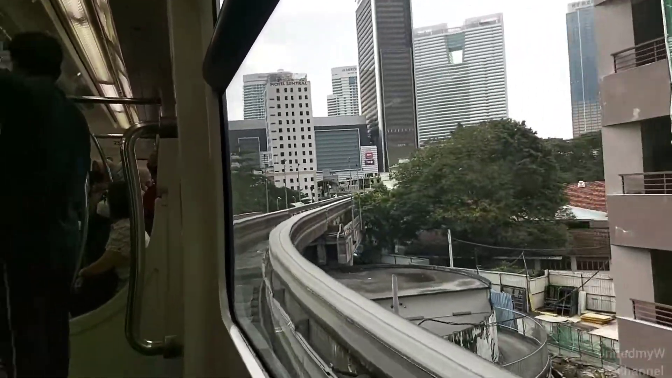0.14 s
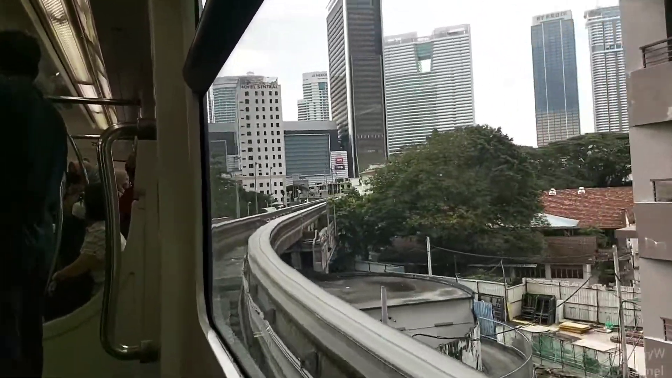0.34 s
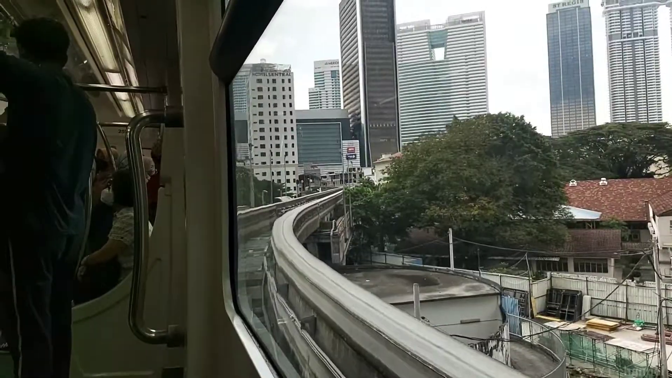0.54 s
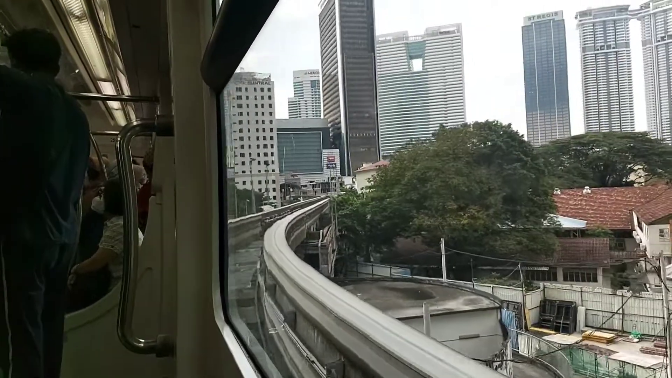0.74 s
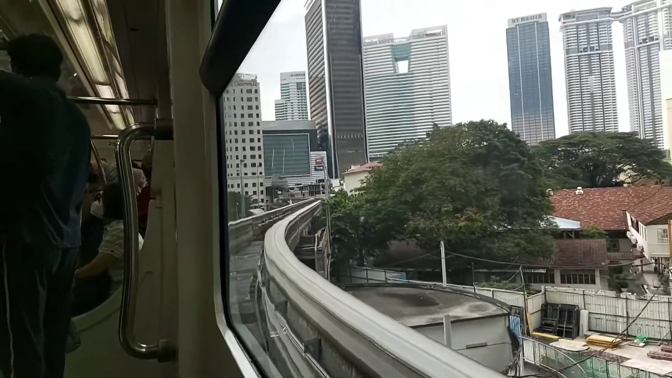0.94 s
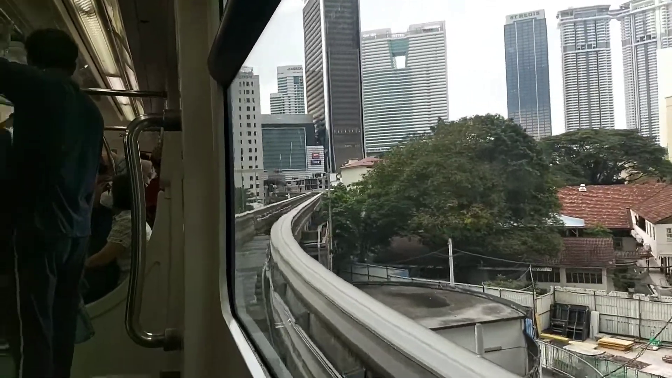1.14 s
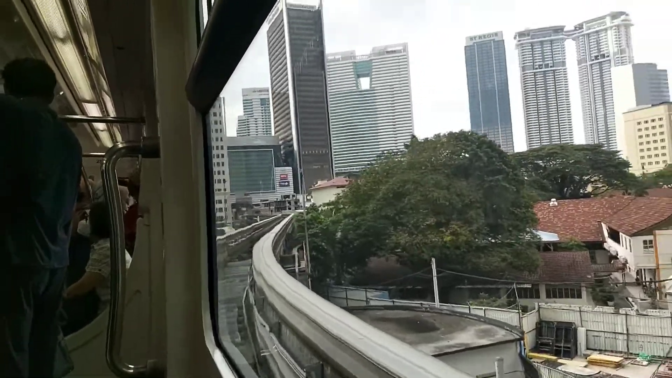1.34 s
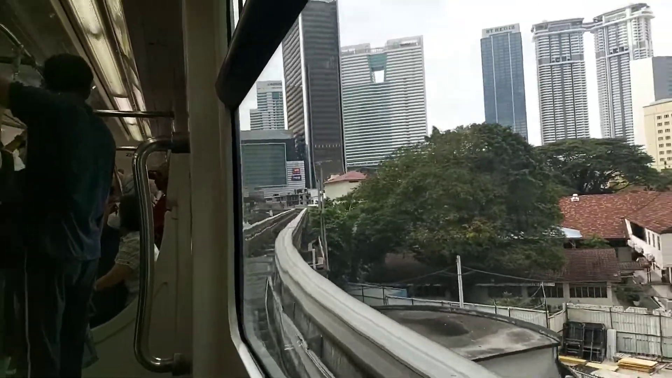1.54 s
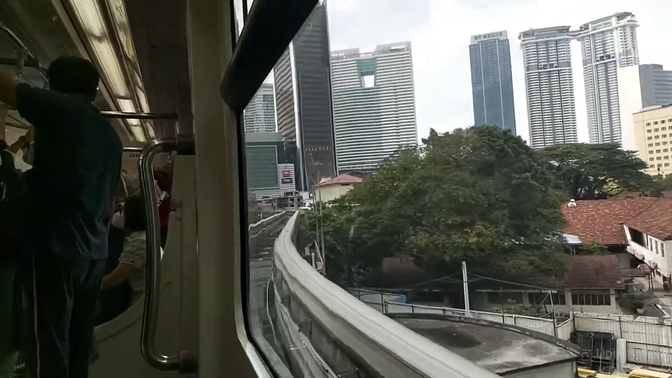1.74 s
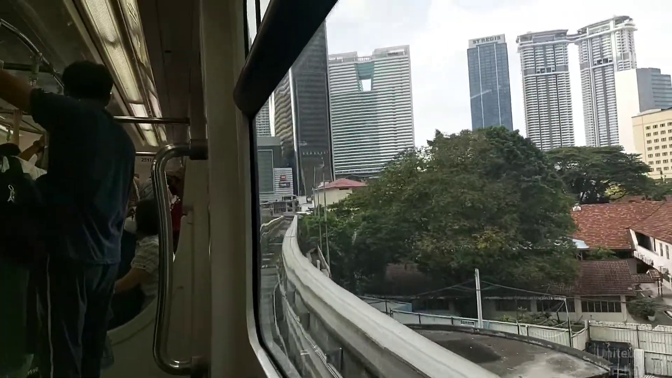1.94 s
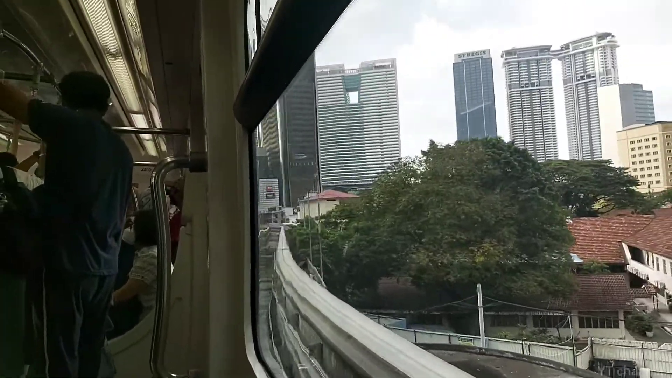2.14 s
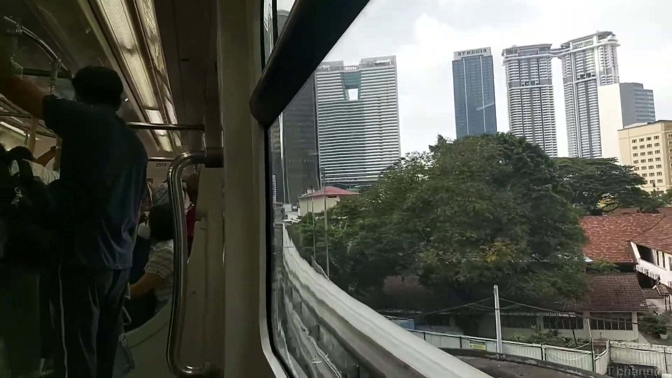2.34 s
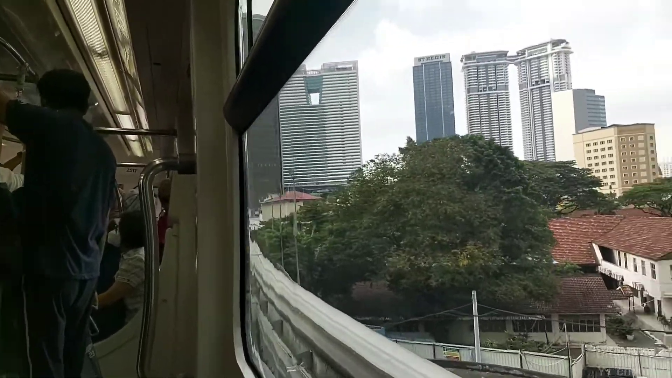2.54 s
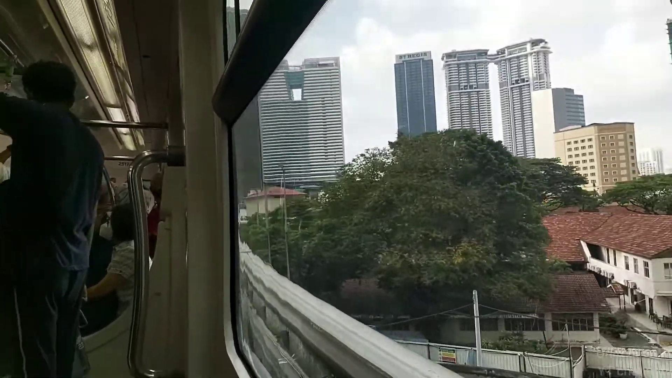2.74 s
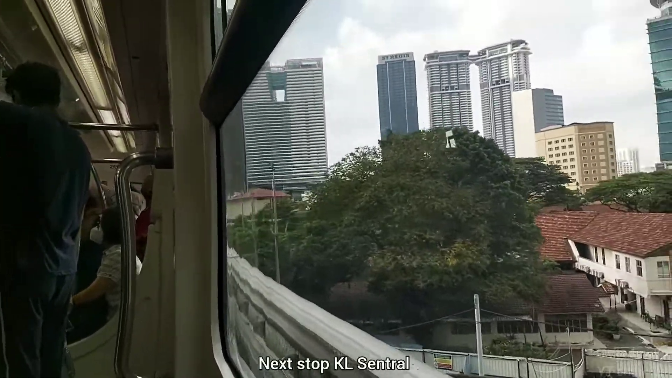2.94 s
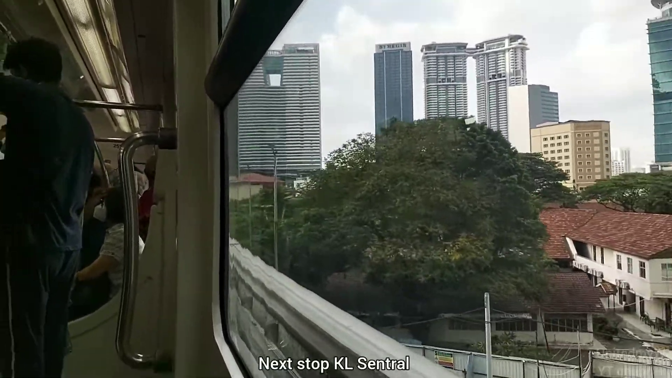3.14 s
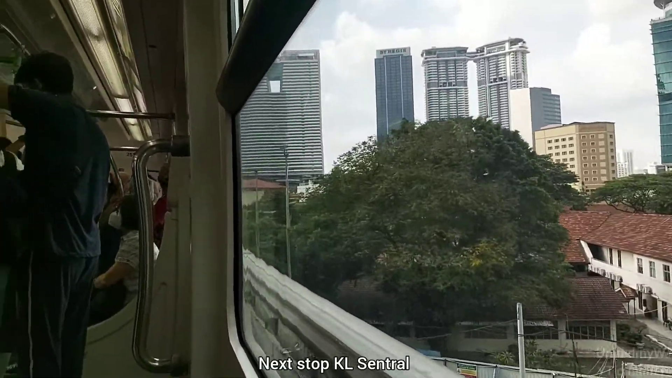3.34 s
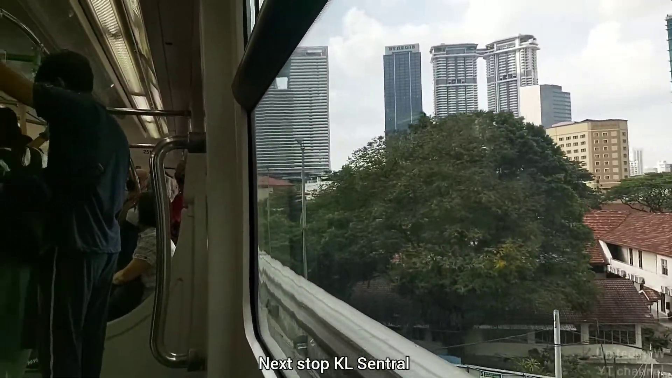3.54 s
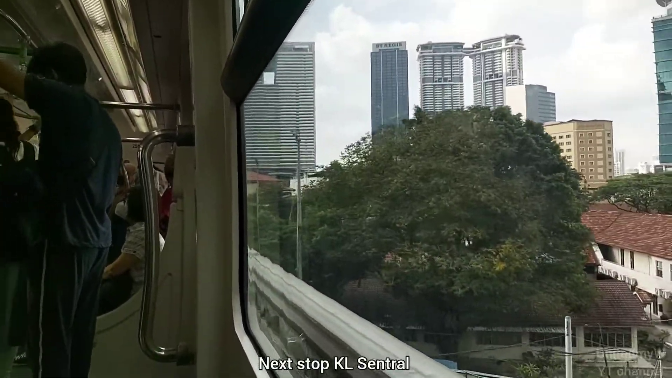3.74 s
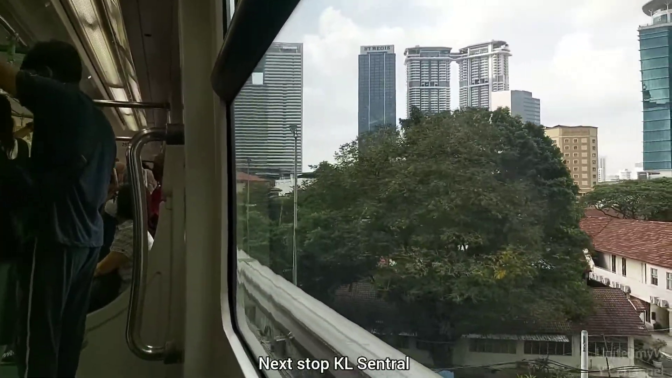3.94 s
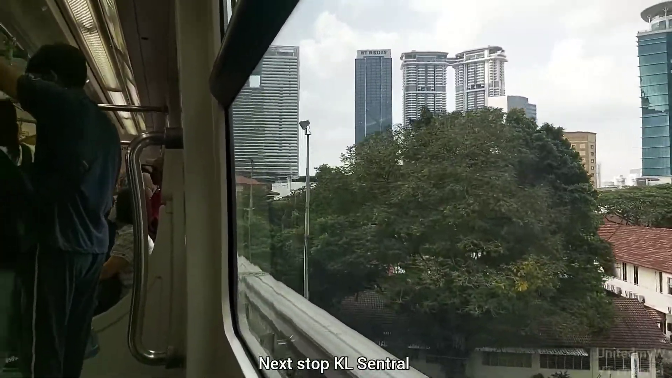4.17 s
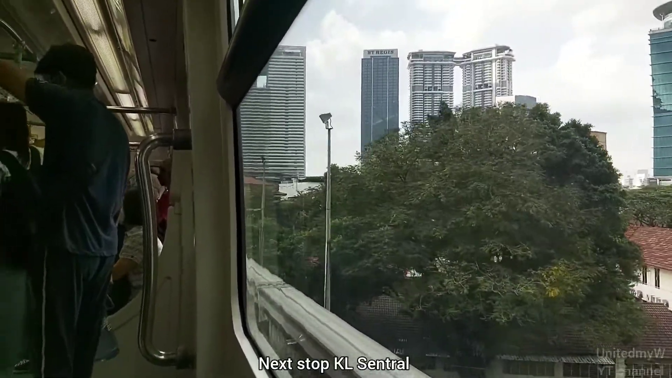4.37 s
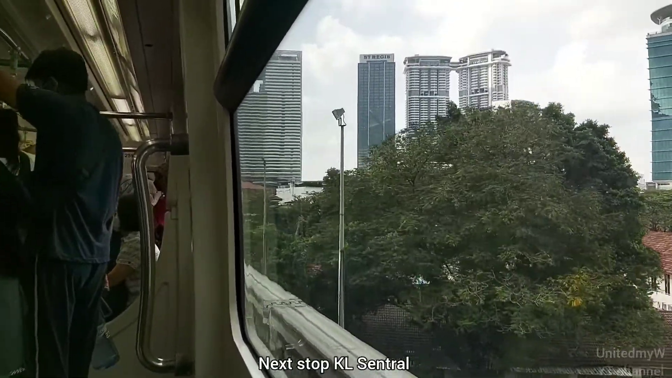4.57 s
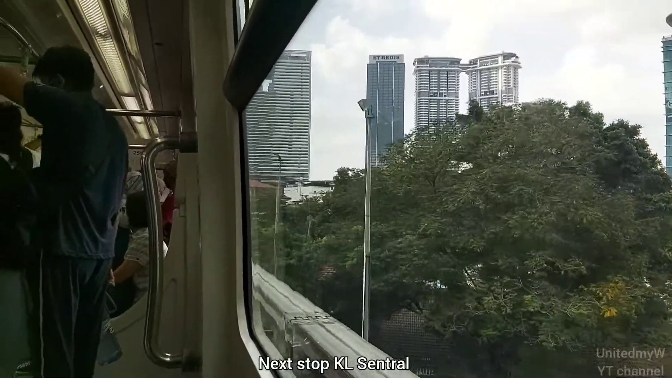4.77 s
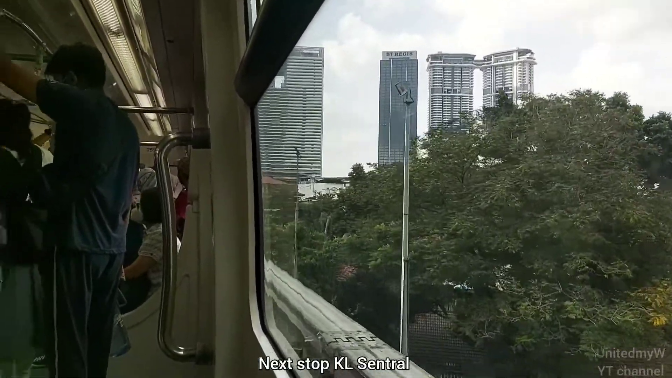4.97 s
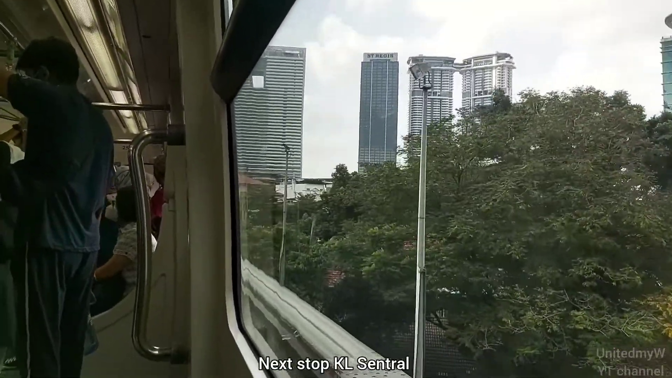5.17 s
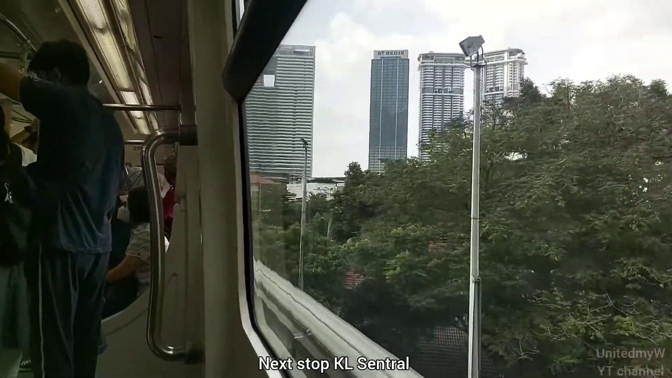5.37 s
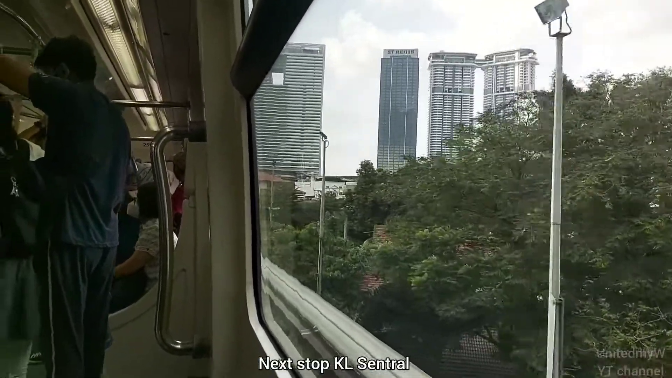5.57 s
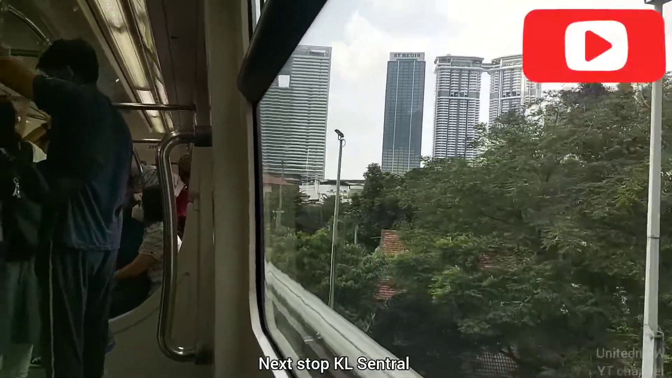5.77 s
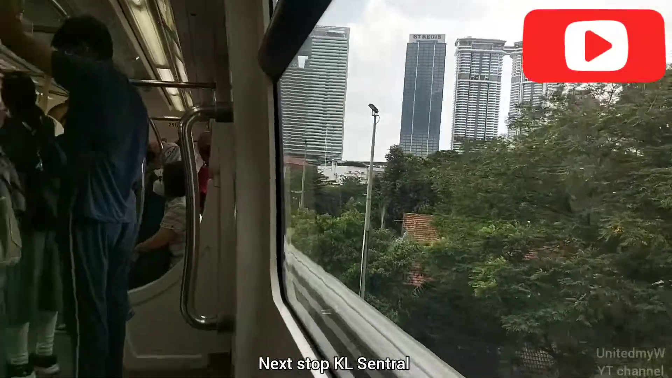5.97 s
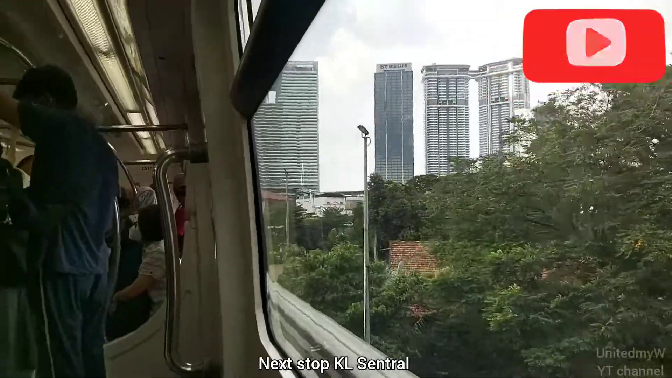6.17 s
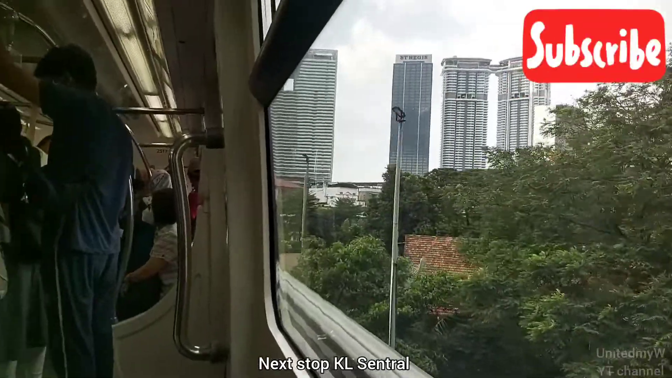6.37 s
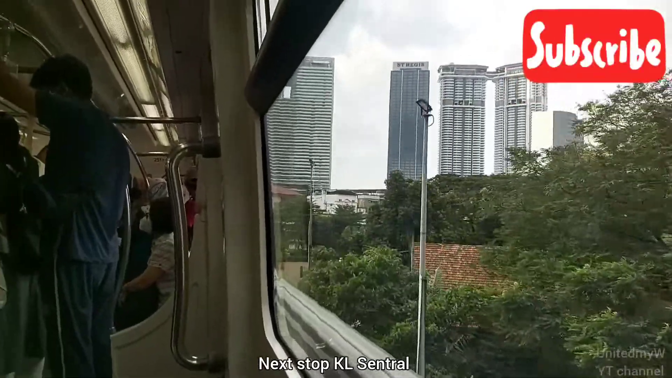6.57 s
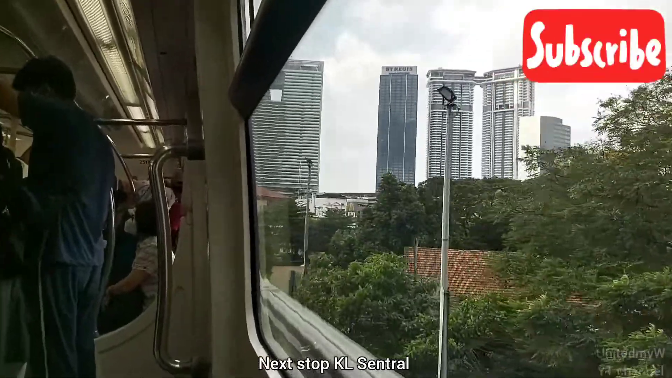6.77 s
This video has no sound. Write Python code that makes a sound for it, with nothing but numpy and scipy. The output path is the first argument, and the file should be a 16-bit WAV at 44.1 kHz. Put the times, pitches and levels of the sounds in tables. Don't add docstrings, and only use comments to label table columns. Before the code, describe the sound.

Steady tyre rumble and muffled rushing air inside a slowing train cabin. A nasal electric gear whine wavers, swells in the middle, then weakens and throbs as it descends. Occasional light ticks, tiny squeaks and chattering panels give way to a double thump with rattle before six seconds, followed by a hard, dry clack. Close, enclosed handheld stereo perspective, with no silence.

```python
import sys
import numpy as np
from scipy import signal
from scipy.fft import rfft, irfft, next_fast_len
from scipy.io import wavfile
from scipy.ndimage import uniform_filter1d

SR = 44100
rng = np.random.default_rng(int(sys.argv[2]) if len(sys.argv) > 2 else 0)


def int16_out(signal):
    q = np.round(np.clip(np.atleast_2d(signal).T, -1, 1) * 32767)
    wavfile.write(sys.argv[1], SR, q.astype(np.int16))


def magnitude_from_level(level_db):
    exponent = np.asarray(level_db, float) / 20
    return 10 ** exponent


N = 300321

# (time [s], level [dB])
RIDE = [(0.0, -18), (0.34, -20), (0.43, -20), (0.95, -18), (1.27, -23.5), (1.4, -19.5), (2.05, -18.5),
        (2.6, -18.5), (2.9, -19), (3.6, -22.5), (4.85, -21), (5.03, -16), (5.2, -22), (5.63, -20.5),
        (5.73, -18), (5.84, -14), (5.99, -18.5), (6.81, -18.5)]
# (time [s], frequency [Hz])
SPEED = [(0.0, 651.5), (.2, 647.5), (.43, 649.5), (.58, 644), (.93, 642), (1.05, 645.5), (1.2, 640.5),
         (1.7, 637.5), (1.78, 638.5), (2.0, 633.5), (2.3, 638.5), (2.5, 634), (3.0, 633.8), (3.4, 623.5),
         (3.8, 613), (5.3, 583.5), (5.7, 574), (6.81, 555.5)]
# (time [s], level [dB])
MOTOR = [(0.0, -35.5), (0.4, -35.5), (0.8, -31), (1.0, -36.5), (1.26, -29), (1.6, -30.5), (1.95, -30),
         (2.3, -32.5), (2.75, -26.5), (3.05, -23.5), (3.5, -23.5), (3.9, -22), (4.25, -23), (4.62, -22.5),
         (5.15, -26.5), (5.6, -30.5), (6.2, -30.5), (6.81, -23.5)]
# (level [dB], relative top level [dB], relative low level [dB])
IDLE_TRIM = (-59, -2.5, 11.2)
# (frequency [Hz], left minus right [dB])
LEAN = [(60, -4), (110, -1.5), (200, -2.5), (380, -5.5), (700, -5), (1290, -3.5), (3300, -2.5), (4300, 1.5),
        (6200, 0), (7200, 6), (7900, 0.5), (8900, -7), (10800, -4), (15000, -0.5)]


def evened(x):
    return x / np.sqrt(np.mean(x ** 2) + 1e-20)


def read(points, hz):
    f, value = np.transpose(points)
    return np.interp(np.log(hz + 1), np.log(f + 1), value)


def columns(rows):
    s, *values = np.transpose(rows)
    return [np.interp(np.arange(N) / SR, s, v) for v in values]


def swells(rows):
    t = np.arange(0, N + 64, 64) / SR
    total = 0
    for s, half, *heights in rows:
        bump = np.maximum(1 - ((t - s) / (2 * half)) ** 2, 0) ** 2
        total = total + np.outer(heights, bump)
    return [np.interp(np.arange(N) / SR, t, v) for v in total]


def wander(hz):
    size = next_fast_len(N)
    rolloff = 1 + (np.fft.rfftfreq(size, 1 / SR) / hz) ** 2
    return evened(irfft(rfft(rng.standard_normal(size)) / rolloff, size)[:N])


def resonate(x, hz, width):
    turn = np.exp(2j * np.pi * np.cumsum(hz) / SR)
    r = np.exp(-np.pi * width / SR)
    low = signal.lfilter([(1 - r) ** 2], [1, -2 * r, r * r], x * turn.conj())
    return evened((turn * low).real)


def ring(hz, width, channels=1):
    b, a = signal.iirpeak(hz, hz / width, SR)
    once = signal.lfilter(b, a, rng.standard_normal((channels, N)))
    return evened(signal.lfilter(b, a, once))


def diffuse(spectrum, patchy_db, size=1024):
    # (frequency [Hz], correlation [1])
    coherence = [(60, .98), (130, .99), (290, .96), (640, .85), (1000, .3), (1400, -.3), (2200, -.03),
                 (15000, 0)]
    frames, hz = 4 * N // size + 5, np.fft.rfftfreq(size, 1 / SR)
    a, b, c, d, patches = rng.standard_normal((frames, len(hz), 5)).T
    patches = evened(uniform_filter1d(uniform_filter1d(patches, 10, 0), 12, 1))
    same = np.clip(read(coherence, hz), -1, 1)[:, None]
    left = a + 1j * b
    right = same * left + np.sqrt(1 - same ** 2) * (c + 1j * d)
    z = np.array([left, right])
    z *= magnitude_from_level(np.outer([.5, -.5], read(LEAN, hz)))[:, :, None]
    z *= magnitude_from_level(read(spectrum, hz)[:, None] + patchy_db * patches)
    x = signal.istft(z, nperseg=size, noverlap=3 * size // 4)[1][:, :N]
    return x / np.sqrt(np.mean(x.mean(0) ** 2))


def steadied(x):
    span = int(.05 * SR)
    power = uniform_filter1d(uniform_filter1d(x.mean(0) ** 2, span), span) + 1e-9
    x = x / power ** (.5 / 2)
    return x / np.sqrt(np.mean(x.mean(0) ** 2))


def placed(x, hz, lag_turns):
    lean = magnitude_from_level(np.array([.5, -.5]) * read(LEAN, hz))
    late = np.interp(np.arange(len(x)) - lag_turns * SR / hz, np.arange(len(x)), x)
    return np.array([lean[0] * x, lean[1] * late])


def tyres():
    # (frequency [Hz], density [dB per Hz])
    rumble = [(12, -48), (20, -19), (86, 1), (135, 0), (230, -13), (300, -8), (510, -120)]
    boom = [(150, -38), (200, 6.5), (330, 5.5), (400, 0), (520, -9), (650, -50)]
    # (frequency [Hz], width [Hz], level [dB])
    cabin = [(93.3, 23, -34), (181.5, 18.3, -33), (281.5, 12.4, -44), (333.2, 13.6, -34.5),
             (385.3, 7.4, -39.5), (577.6, 17, -41)]
    # (time [s], half length [s], rumble [dB], boom
    # [dB])
    joints = [(.2, 0.022, 1, 3), (.33, 0.031, 0.5, 2.5), (.42, 0.029, -4.5, 2.5), (.52, 0.055, 0, -5),
              (.8, 0.026, -1, -2.5), (1.0, 0.027, 4, 2.5), (1.26, 0.034, 1.5, -1.5), (1.348, 0.02, 1.5, 8),
              (1.55, 0.097, 0, 2), (1.722, 0.039, -3, 1), (1.977, 0.032, -3.5, 2.5), (2.2, 0.23, 0, -0.5),
              (2.5, 0.056, -0.5, 5), (2.44, 0.013, -2, -1), (2.655, .02, -4, 0), (5.865, .012, -5, -1),
              (2.69, 0.039, 2, -3), (2.82, 0.042, -1, 0.5), (3.05, 0.062, 1, -4), (3.55, 0.055, 1, 0.5),
              (3.68, 0.023, 3, 0), (4.05, 0.077, 2.5, -3), (4.36, .05, 0, 2), (4.62, 0.064, 1.5, -4),
              (4.8, .05, -1, 2.5), (5.12, 0.026, 1.5, -8), (5.4, 0.052, -0.5, -1.5), (5.6, 0.074, -1.5, 0),
              (5.7, 0.032, 2, -3), (5.77, .04, -1.5, 2), (5.82, 0.037, -1, 4), (5.93, 0.032, -1, 2),
              (6.12, .04, -1, -2.5), (6.3, 0.057, -2, 4), (6.55, 0.086, -0.5, -2), (6.693, 0.026, -6, -2)]
    rumble_db, = columns(RIDE)
    bump_db = rumble_db - rumble_db.mean()
    joint_rumble_db, joint_boom_db = swells(joints)
    out = magnitude_from_level(rumble_db + joint_rumble_db) * steadied(diffuse(rumble, 0.77, size=2048))
    boom_db = -26.5 + 0.52 * bump_db + joint_boom_db
    out += magnitude_from_level(boom_db) * steadied(diffuse(boom, 0.95, size=2048))
    shake = magnitude_from_level(0.24 * bump_db)
    for hz, width, db in cabin:
        out += placed(magnitude_from_level(db) * shake * ring(hz, width)[0], hz, 0.065)
    return out


def throb_of_wheel(hz):
    return np.cos(2 * np.pi * (np.cumsum(hz) / SR / 87 + .63))


def motor():
    # (time [s], level [dB])
    slack = [(.07, -14), (.245, -6), (.36, -5), (.665, -15), (.75, -3), (1.095, -4), (1.405, -18),
             (1.72, -24), (1.855, -7), (2.0, -16), (2.075, -20), (2.11, -18), (.03, -6), (2.64, -2),
             (4.82, -1), (4.9, 1.5), (2.18, -12), (2.225, -8), (2.33, -16), (2.43, -19), (2.575, -22),
             (2.715, -36), (2.78, -12), (2.87, -18), (2.98, -3.5), (3.21, -6), (3.34, -14), (3.445, -5),
             (3.57, -4.5), (3.735, -8), (4.46, -6), (5.09, -13), (5.25, -21), (5.425, -9), (5.555, -22),
             (5.68, -1), (5.775, -6), (5.87, -32), (6.0, -12), (6.14, -7), (6.21, -5), (6.32, -17),
             (6.435, 0), (6.575, -11), (.14, 6), (.6, 4), (2.14, 2), (2.26, 5.5), (5.16, 6), (5.32, 3),
             (5.495, 5), (5.65, 4), (5.74, 7), (5.81, 4), (5.95, 3.5), (6.075, 7), (6.72, -6),
             (.32, 5), (.8, 3), (1.14, 4.5), (1.82, 3), (2.82, 5.5), (2.93, 3), (3.04, 3.5), (3.52, 2.5),
            (3.62, -1.5), (3.88, 1.5), (4.01, 3), (4.55, 1.5), (6.18, 4), (6.63, 3)]
    hz, = columns(SPEED)
    level_db, = columns(MOTOR)
    braking = np.clip((636 - hz) / 5, 0, 1) * np.clip((hz - 578) / 8, 0, 1)
    sway_hz = 2.4 * braking * np.cos(2 * np.pi * (np.cumsum(hz) / SR / 110 + .39))
    phase = 2 * np.pi * np.cumsum(hz + sway_hz + .7 * wander(6.9)) / SR
    clean = np.sqrt(2) * np.sin(phase) * magnitude_from_level(.7 * wander(20))
    skirt = magnitude_from_level(-18) * resonate(rng.standard_normal(N), hz, 36)
    octave = magnitude_from_level(-17.5) * resonate(rng.standard_normal(N), 2 * hz, 27)
    slack_db, = swells([(s, .017, db) for s, db in slack])
    throb_db = (-0.1 + 0.0573 * np.maximum(605 - hz, 0)) * throb_of_wheel(hz)
    whine = placed(clean + skirt, 1200, 0.053) + placed(octave, 1190, 0.45)
    return magnitude_from_level(level_db + throb_db + slack_db) * whine


def floor_panel():
    hz, = columns(SPEED)
    level_db, = columns(MOTOR)
    panel_hz = 640 + 0.094 * np.minimum(hz - 635, 0)
    effort_db = uniform_filter1d(level_db, SR // 2) - level_db.max()
    panel_db = -30.5 + 0.33 * effort_db + 0.5 * throb_of_wheel(hz)
    panel_db -= 16 * (1 - np.clip((636 - hz) / 22, 0, 1))
    panel_db -= .6 * np.maximum(574 - hz, 0)
    panel = steadied(resonate(rng.standard_normal((1, N)), panel_hz, 14.7))[0]
    return placed(magnitude_from_level(panel_db) * panel, 630, 0.11)


def window_pane():
    hz, = columns(SPEED)
    waking = np.exp(-.5 * ((hz - 576.6) / 14.4) ** 2)
    pane = resonate(rng.standard_normal(N), np.full(N, 610), 21)
    return placed(magnitude_from_level(-33) * waking * pane, 630, 0.11)


def short_tones(rows):
    out = np.zeros((2, N))
    for (s, hz, glide, length, db), lag in zip(rows, rng.uniform(0, 0.16, len(rows))):
        u = np.linspace(0, 1, int(length * SR))
        swell = np.sin(np.pi * u ** 0.6) * magnitude_from_level(db + 5.5)
        tone = np.sin(2 * np.pi * np.cumsum(hz + glide * u) / SR) * swell
        rasp = evened(uniform_filter1d(uniform_filter1d(rng.standard_normal(len(u)), 130), 130))
        tone = tone * (1 + .45 * (hz > 1000) * rasp)
        start = int(s * SR)
        out[:, start:start + len(u)] += placed(tone, hz, lag * min(hz, 900) / 700)
    return out


def jolts():
    # (time [s], frequency [Hz], glide [Hz], length [s], level [dB])
    booms = [(0.173, 286, -3.5, 0.13, -22.5), (.3, 178, -8, 0.036, -21), (1.74, 158, 15, 0.058, -17),
             (2.472, 317, -4, 0.049, -16), (2.476, 160, 5, 0.041, -14), (2.445, 140, 15, .035, -20),
             (2.512, 323.4, 2, 0.045, -21), (2.516, 110, 0, 0.04, -17), (2.572, 111.5, 20, 0.074, -15),
             (2.633, 317, -5, 0.032, -21.5), (2.675, 114, 6, 0.033, -18.5), (2.74, 145, 2, 0.096, -20.5),
             (2.78, 67, -3, 0.05, -20), (5.79, 111, 76, 0.045, -15), (5.755, 89, 0, 0.033, -16),
             (5.72, 84, 11, .035, -21), (5.814, 302, -10, 0.036, -17.5), (5.801, 249, 0, .06, -26.5),
             (5.92, 325, 8, .035, -26), (5.828, 182, 8, 0.045, -13), (5.882, 112, -8, 0.032, -16.5),
             (5.905, 86, 0, 0.032, -14), (4.6, 68, 2, 0.034, -21), (5.1, 93, -15, 0.035, -18),
             (5.908, 290, 2, 0.022, -18.5), (5.95, 98, -4, 0.033, -17), (5.85, 220, 2, 0.174, -32),
             (1.302, 290, 2, 0.084, -28), (2.478, 255, 0, 0.037, -22), (5.66, 240, 0, .05, -24.5),
             (2.7, 245, 0, .05, -25.5), (4.58, 330, 2, .06, -29.5), (1.7, 215, 0, 0.047, -24),
             (.85, 280, 0, .05, -25)]
    return short_tones(booms)


def squeaks():
    # (time [s], frequency [Hz], glide [Hz], length [s], level [dB])
    slips = [(0.167, 786, -20, 0.084, -33), (1.156, 862, 71, 0.078, -35), (1.49, 757, -58, 0.065, -32.5),
             (1.953, 1700, -11, 0.03, -38.5), (1.935, 1874, 60, 0.03, -43), (1.973, 2030, -90, .045, -39),
             (2.025, 1700, 3, .035, -43), (2.691, 1925, 0, 0.025, -38.5), (2.727, 1975, 0, 0.017, -37),
             (2.748, 1900, 0, .02, -38), (2.757, 2450, 0, .018, -41), (2.745, 6240, -200, .02, -50),
             (2.762, 5400, -200, .02, -51), (3.174, 2350, -5, .018, -43), (3.047, 2415, -120, .02, -39),
             (3.06, 766, 30, 0.077, -34), (3.066, 6420, 2, .014, -50), (3.204, 282.9, -6, 0.46, -29),
             (4.52, 723, 1, 0.08, -39), (4.919, 454, 30, 0.088, -31), (0.712, 640, -47, 0.026, -25),
             (.85, 423, 60, 0.09, -33), (1.588, 625, -49, 0.027, -28), (.35, 623, -60, 0.031, -30),
             (2.03, 650, -130, 0.029, -34), (5.766, 1750, 0, .035, -41), (5.825, 2350, 0, 0.05, -41),
             (5.838, 7250, 120, 0.04, -54), (6.225, 1130, 0, 0.03, -38), (5.758, 930, -2, .04, -36),
             (6.22, 2110, 0, 0.039, -49)]
    return short_tones(slips)


def pings():
    # (time [s], frequency [Hz], glide [Hz], length [s], level [dB])
    strikes = [(1.8, 1320, 0, .025, -41), (2.358, 1330, 0, .022, -41), (2.358, 2030, 40, .025, -42),
               (2.41, 1500, 0, .02, -45), (2.43, 2300, 0, .018, -45), (2.6, 1350, 0, .025, -42),
               (2.07, 1380, 0, .02, -44), (2.635, 1250, 0, .022, -42), (2.725, 1550, 0, .015, -39),
               (2.72, 6150, 0, .025, -52), (3.1, 3600, 0, .022, -47), (3.115, 5000, 0, .015, -50),
               (3.07, 1900, 0, .02, -43), (3.025, 1900, 0, .015, -43), (2.8, 1850, 0, .02, -44),
               (5.832, 3300, 0, .015, -48), (5.895, 3700, 0, .015, -50), (5.93, 1950, 0, .018, -47),
               (6.23, 1700, 0, .02, -40), (5.92, 480, 10, .06, -33), (.77, 560, 0, .05, -35),
               (1.7, 575, -2, .06, -35), (.34, 570, 0, .06, -36)]
    return short_tones(strikes)


def latch():
    # (time [s], peak level [dB], lowest frequency [Hz], highest frequency [Hz])
    clicks = [(2.642, -43, 12500, 15300), (5.4, -42, 2000, 5800), (5.898, -36, 8500, 13500),
              (5.9, -34, 1500, 6000), (5.904, -41, 13100, 15600), (2.7, -42, 5000, 15500),
              (.163, -40, 3000, 7500), (5.138, -41.5, 3500, 7500), (6.725, -47, 3500, 7500),
              (6.5, -54, 8000, 15000), (4.385, -55, 8000, 15000), (3.02, -47, 3500, 14000),
              (2.235, -46, 2500, 7500), (6.207, -42, 2000, 6000), (6.232, -25, 830, 3000),
              (6.234, -39, 2500, 13000), (5.832, -33, 2000, 7500), (5.752, -35.5, 1200, 6000),
              (5.772, -32, 1400, 5000), (5.935, -36, 1500, 2500), (2.362, -36, 1200, 2300)]
    out, t = np.zeros((2, N)), np.arange(3000) / SR
    fade = magnitude_from_level(-60 * t / .012) + magnitude_from_level(-12 - 60 * t / .07)
    for s, db, low_hz, high_hz in clicks:
        band = signal.butter(2, [low_hz, high_hz], "bandpass", fs=SR, output="sos")
        burst = evened(signal.sosfilt(band, rng.standard_normal((2, len(t))))) * fade
        out[:, int(s * SR):int(s * SR) + len(t)] += magnitude_from_level(db - 2.5) * burst
    return out


def scuff():
    out, start, t = np.zeros((2, N)), int(3.07 * SR), np.arange(5000) / SR
    hz = np.interp(t, [.02, .09], [3200, 5600])
    swell = magnitude_from_level(np.interp(t, [0, .03, .07, .11], [-90, -47.5, -44, -90]))
    out[:, start:start + len(t)] = swell * resonate(rng.standard_normal((2, len(t))), hz, 950)
    return out


def bursts():
    # (time [s], length [s], peak level [dB], relative top level [dB], relative low level [dB])
    rattles = [(0.0, 0.048, -44, -3, 7), (0.33, 0.07, -52, -1.5, 12), (0.839, 0.15, -50, -3, 13),
               (1.098, 0.11, -58, -4, 18), (1.5, 0.07, -50.5, -1.5, 14), (1.71, 0.18, -54, -5, 6),
               (1.936, 0.079, -43, -2.5, 4.5), (2.214, .13, -46.5, -3.5, 10.5),
               (2.343, 0.15, -47.5, -4, 7.5), (2.6, 0.099, -49, -3, 6), (2.683, 0.1, -42.5, -2, 5),
               (3.019, 0.14, -47.5, -3, 7.5), (3.198, 0.08, -59.5, 4, 17.5), (4.098, 0.14, -56, -4, 9),
               (4.764, .08, -57, -8, 15), (4.925, .07, -59.5, -10, 22.5), (5.743, 0.068, -44.5, -10, 13),
               (5.826, 0.038, -40.5, -11, 8), (5.878, 0.049, -44.5, -8, 8), (6.21, 0.11, -45.5, -10, 14.5),
               (6.3, .25, -50.5, -18, 4), (5.787, 0.039, -49.5, 2, 3), (1.005, .06, -60, -5, 6),
               (1.807, .06, -55.5, 0, 1), (4.36, 0.13, -60, -2, 6), (4.97, .1, -61, 2, 4),
               (6.04, 0.092, -56, -10, 3), (6.55, 0.36, -54, -11, -3), (2.776, .05, -49, -4, 11.5)]
    t = np.arange(0, N, 32) / SR
    idle_db, idle_top_db, idle_low_db = IDLE_TRIM
    power = magnitude_from_level(idle_db) ** 2 * np.ones(len(t))
    top, low = power * magnitude_from_level(idle_top_db) ** 2, power * magnitude_from_level(idle_low_db) ** 2
    for s, length, db, top_db, low_db in rattles:
        shape_db = np.interp((t - s) / length, [-.35, 0, .22, .64, 1, 2.3], [-40, -7, 0, -2, -7, -40])
        one = magnitude_from_level(db + shape_db) ** 2
        power = power + one
        top = top + one * magnitude_from_level(top_db) ** 2
        low = low + one * magnitude_from_level(low_db) ** 2
    return np.repeat(np.sqrt([power, top, low]), 32, axis=1)[:, :N]


def trim(chatter):
    # (frequency [Hz], density [dB per Hz])
    colour = [(700, -21), (1200, 14), (2000, 12), (3000, 4.5), (4500, 1.5), (7400, -2), (8100, -10),
              (12600, -7), (13600, -10.5), (16000, -12.5)]
    middle_gain, top_gain, low_gain = chatter
    sound = diffuse(colour, 1.2, size=512) * magnitude_from_level(0.6 * wander(91))
    low = signal.sosfiltfilt(signal.butter(2, 3500, fs=SR, output="sos"), sound)
    top = signal.sosfiltfilt(signal.butter(4, 7900, "highpass", fs=SR, output="sos"), sound)
    middle = sound - low - top
    return magnitude_from_level(1.5) * (middle_gain * evened(middle) + top_gain * evened(top) + low_gain * evened(low))


def air(chatter):
    # (frequency [Hz], density [dB per Hz])
    roar = [(380, -72), (470, 2), (775, -2), (1020, -6), (1210, -10), (1640, -13), (2080, -13), (2630, -19),
            (3600, -24), (5350, -33.5), (7300, -37.5), (8100, -42.5), (12600, -43), (15800, -63)]
    # (frequency [Hz], width [Hz], level [dB])
    hums = [(2088, 3.6, -54), (2465, 14, -56), (1854, 180, -48.5)]
    # (time [s], half length [s], level [dB])
    gusts = [(.18, 0.025, 1.5), (.9, 0.06, -1), (2.05, 0.054, 1.5), (2.58, 0.041, -1), (3.7, 0.14, -0.5),
             (5.2, 0.26, 1), (5.78, 0.039, 3), (5.9, .03, 1), (6.25, 0.021, 2), (6.4, 0.031, 0.5),
             (6.7, 0.12, -1.5)]
    rumble_db, = columns(RIDE)
    rattle_db = 20 * np.log10(chatter[0]) - IDLE_TRIM[0]
    lift_db = 0.078 * (rumble_db - rumble_db.mean()) + 0.035 * rattle_db + swells(gusts)[0]
    out = magnitude_from_level(-35 + lift_db + 4.5) * diffuse(roar, 0.35)
    for hz, width, db in hums:
        out += magnitude_from_level(db + 2.6 * lift_db) * ring(hz, width, channels=2)
    return out


def scene():
    chatter = bursts()
    running = tyres() + motor() + floor_panel() + window_pane()
    strikes = jolts() + squeaks() + pings() + latch() + scuff()
    return running + strikes + trim(chatter) + air(chatter)


def band_limit(x):
    return signal.sosfilt(signal.butter(12, 15790, fs=SR, output="sos"), x)


def record(dry):
    # (time [s], drop [dB], recovery [s])
    ducks = [
        (2.5, -1.5, 0.47),
        (5.96, -2.5, 9),
    ]
    t = np.arange(N) / SR
    duck_db = 0
    for s, db, back in ducks:
        duck_db = duck_db + db * np.clip((t - s) / 0.016, 0, 1) * np.exp(-np.maximum(t - s, 0) / back)
    gain = magnitude_from_level(duck_db) * np.minimum((t[-1] - t) / .003, 1)
    dulled = signal.sosfilt(signal.butter(2, 14500, fs=SR, output="sos"), dry * gain)
    limited = 1.59 * np.tanh(dulled / 1.64)
    return band_limit(limited)


dry = scene()
out = record(dry)
int16_out(out)
```